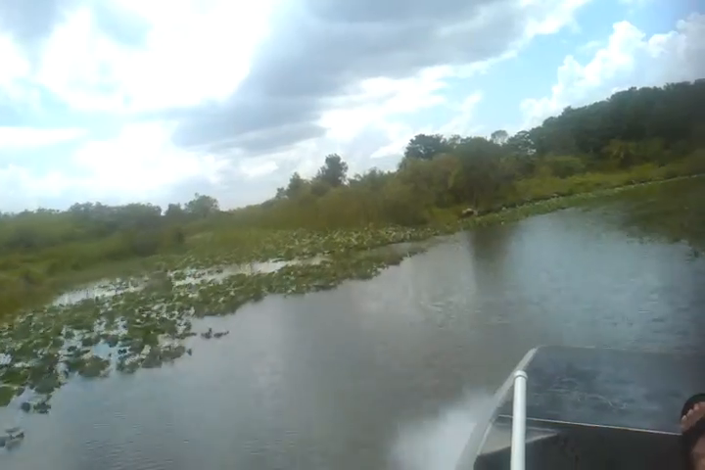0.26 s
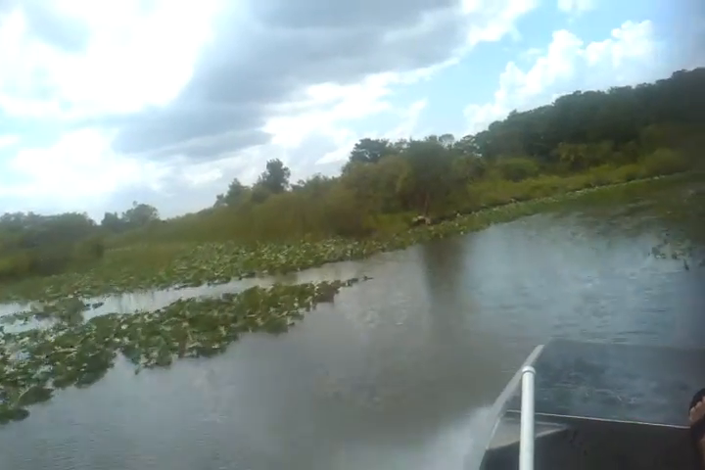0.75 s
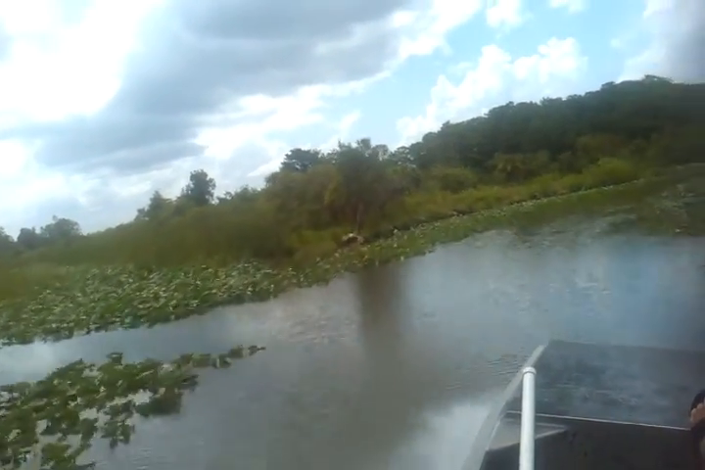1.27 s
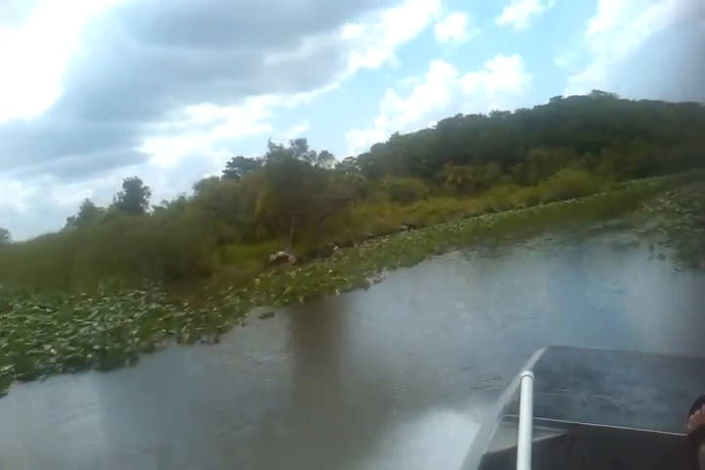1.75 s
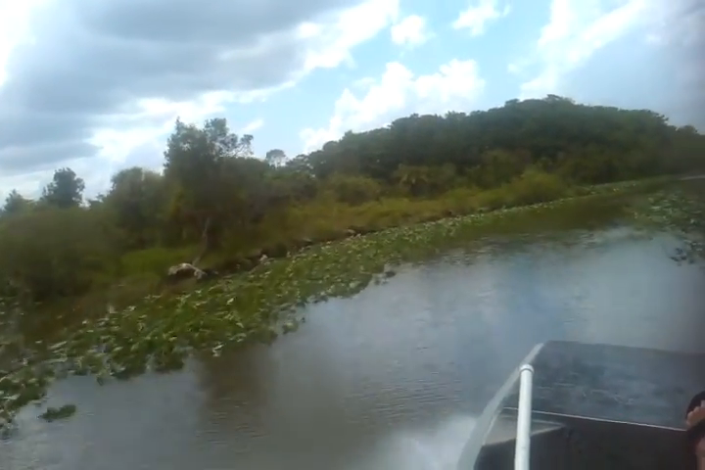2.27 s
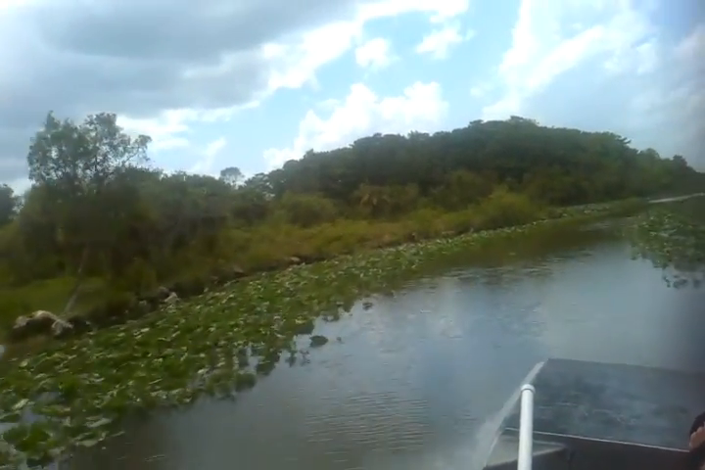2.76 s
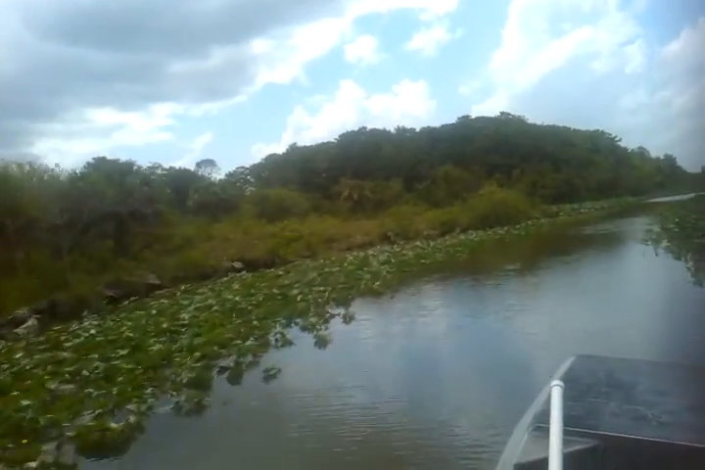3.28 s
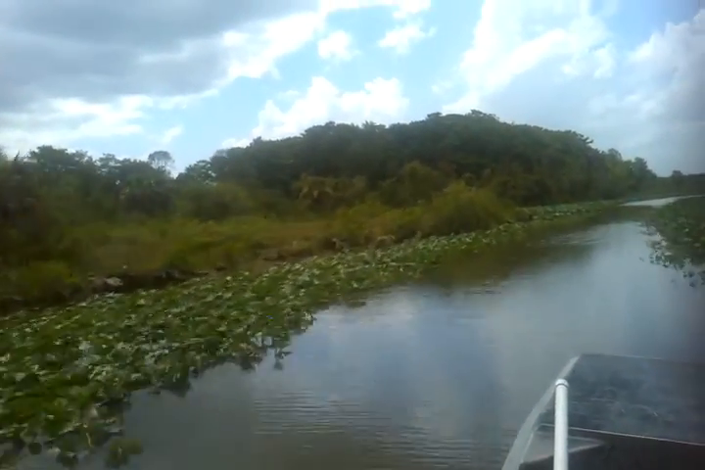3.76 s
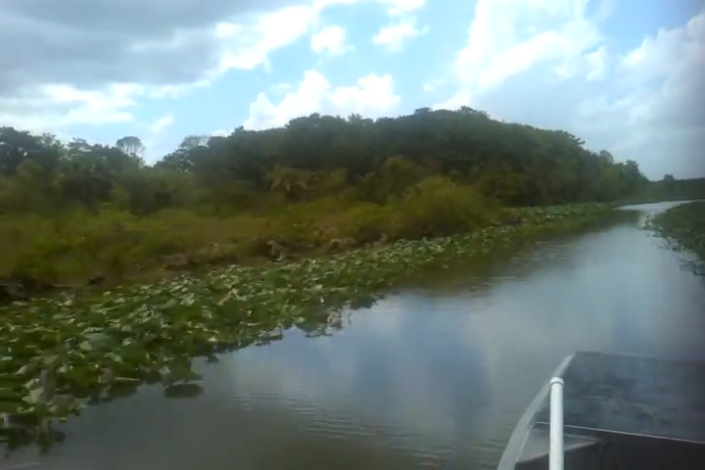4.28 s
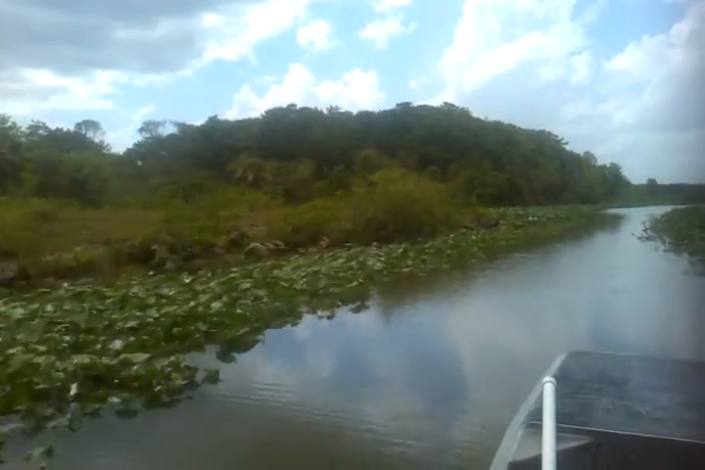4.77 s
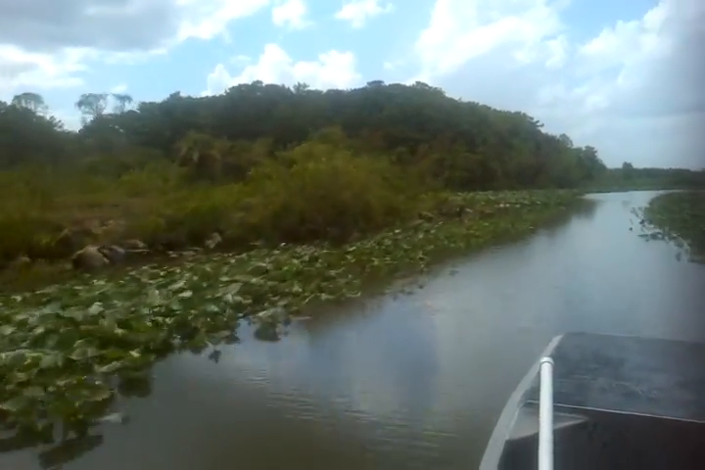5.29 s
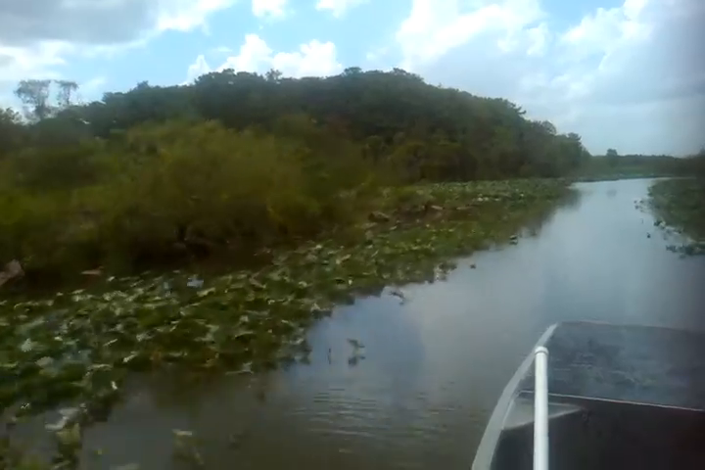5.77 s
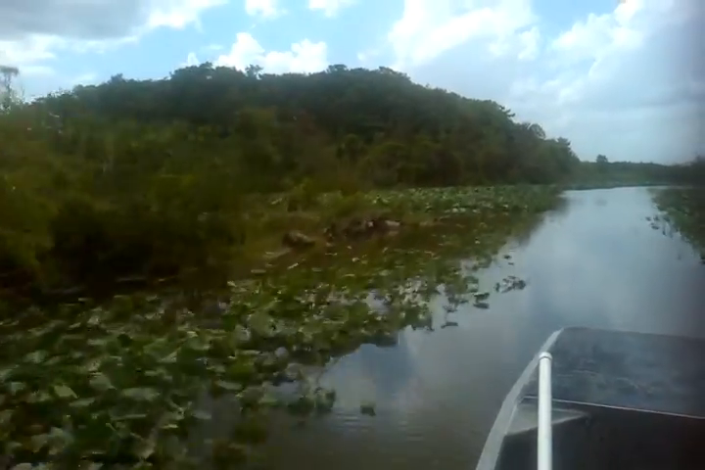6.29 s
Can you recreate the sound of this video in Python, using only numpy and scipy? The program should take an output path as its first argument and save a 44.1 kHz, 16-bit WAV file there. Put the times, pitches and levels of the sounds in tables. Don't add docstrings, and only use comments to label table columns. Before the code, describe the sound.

A continuous, dense airboat roar fills everything, captured close by a small stereo microphone ahead of the propeller cage. It begins at a moderate cruise, a buzzing, throbbing low drone with windy roar and fine hiss on top. After about two seconds the engine pulls harder, rising a few semitones and growing fuller, then holds nearly level to the end. The sound is outdoors, dry, with no echo, and lightly compressed.

```python
import sys
import numpy as np
from scipy import signal
from scipy.fft import rfft, irfft, next_fast_len
from scipy.io import wavfile
from scipy.ndimage import uniform_filter1d

SR = 44100
rng = np.random.default_rng(int(sys.argv[2]) if len(sys.argv) > 2 else 0)


def rack_gain(trim_db):
    fader = np.asarray(trim_db, float)
    return 10 ** (fader / 20)


def store_pcm(level_fs):
    pcm = np.round(np.clip(level_fs, -1, 1) * 32767).astype(np.int16)
    wavfile.write(sys.argv[1], SR, np.atleast_2d(pcm).T)


N = 288414
WIDE = next_fast_len(N)
STEP = 64
COARSE = N // STEP + 1
SLOW_HZ, FAST_HZ = 27.8, 32.8
GEAR = 2.61887


def fine(coarse):
    return np.interp(np.arange(N) / STEP, np.arange(len(coarse)), coarse)


def walk(rate_hz):
    hold = int(SR / STEP / rate_hz)
    held = np.repeat(rng.standard_normal(COARSE // hold + 1), hold)
    return 1.25 * uniform_filter1d(uniform_filter1d(held, hold), hold)[:COARSE]


def colour(table, hz):
    table_hz, value = np.transpose(table)
    return np.interp(np.log(hz + 1), np.log(table_hz), value)


# time_s, firing_cycle_hz
ENGINE_SPEED = [(0, 27.75), (.45, 27.85), (.85, 27.81), (1.1, 27.68), (1.4, 28.13), (1.7, 28.3),
                (1.95, 28.71), (2.3, 29.18), (2.45, 29.64), (2.8, 31.19), (3, 31.72), (3.3, 32.18),
                (3.75, 32.49), (4.5, 32.76), (4.85, 32.75), (5.5, 32.98), (5.9, 33.02), (6.54, 32.9)]


def engine_speed():
    time_s, firing_hz = np.transpose(ENGINE_SPEED)
    hz = np.interp(np.arange(COARSE) * STEP / SR, time_s, firing_hz)
    linger = int(.6 * SR / STEP)
    full_pull_hz_per_s = 4
    pull = uniform_filter1d(np.gradient(hz, STEP / SR), linger) / full_pull_hz_per_s
    return hz, pull


# pitch_hz, level_db (per Hz)
SHARED_NOISE = [(30, -58), (60, -58), (100, -56.5), (140, -53), (220, -48.5), (400, -49.5), (700, -55.5),
                (1200, -58.5), (2000, -65), (3800, -74), (5000, -76.5), (7300, -65.5), (10500, -74.5),
                (13500, -74)]
# pitch_hz, level_db (per Hz)
PORT_DIFFERENCE = [(30, -71.5), (60, -73), (100, -66), (160, -61), (250, -54.5), (400, -61.5), (700, -61),
                   (1000, -63), (2200, -66.5), (3200, -72.5), (5200, -76.5), (7500, -65), (10500, -74.5),
                   (13500, -73.5)]
# pitch_hz, share (-1 to 1)
LATE_SHARE = [(100, .3), (400, 0.36), (900, .01), (2200, 0.35), (4000, 0.089), (10000, .1)]


def slipstream_and_spray(cycle, blade, hz, pull):
    roar_db = .56 * hz + .54 * pull
    spray_db = .19 * hz + .6 * pull
    pitch = np.fft.rfftfreq(WIDE, 1 / SR)
    shared, other = rfft(rng.standard_normal((2, WIDE)))
    late = np.clip(colour(LATE_SHARE, pitch), -.95, .95)
    differ = 1j * late * shared + np.sqrt(1 - late ** 2) * other
    shared = shared * rack_gain(colour(SHARED_NOISE, pitch))
    differ = differ * rack_gain(colour(PORT_DIFFERENCE, pitch))
    pair = np.array([shared, differ]) * np.sqrt(SR / 2)

    roar, spray = np.zeros((2, N)), np.zeros((2, N))
    for octave in np.arange(4.5, 14.5, .75):
        window = np.clip(1 - np.abs(np.log2(pitch + 1) - octave) / .75, 0, 1)
        band = irfft(pair * window, WIDE)[:, :N]
        if 2 ** octave < 5000:
            swell_db = roar_db - roar_db.mean() + .18 * walk(5) + .52 * walk(20)
            roar += band * fine(rack_gain(swell_db))
        else:
            swell_db = spray_db - spray_db.mean() + .15 * walk(5.4) + .73 * walk(22)
            spray += band * fine(rack_gain(swell_db))
    throb = .14 * np.cos(blade - 2.3)
    throb += .2 * np.cos(3 * cycle - 1.3) + .08 * np.cos(2 * cycle + .3)
    return rack_gain(1.5) * roar * (1 + throb) + rack_gain(2.05) * spray * (1 + .22 * throb)


# pitch_hz, share (0 to 1)
OPPOSITE_PORT = [(3500, 0.98), (4400, 0.38), (5500, 0.27), (9000, 0), (14000, 0.27)]


def ports(pair):
    lag_samples, split_hz = 15, 7500
    pitch = np.fft.rfftfreq(WIDE, 1 / SR)
    share = np.clip(colour(OPPOSITE_PORT, pitch), 0, 1)
    pair = rfft(pair, WIDE)
    late = pair * np.exp(-2j * np.pi * pitch * lag_samples / SR) * np.array([[-1], [1]])
    windy = pair + share * late
    calm = (pair + late) * np.sqrt((1 + share ** 2) / 2)
    heard = irfft(windy, WIDE)[:, :N]
    for band, depth in ((pitch < split_hz, .62), (pitch >= split_hz, .72)):
        lull = np.array([fine(np.clip(depth * walk(45) - .05, 0, 1)) for _ in pair])
        heard = heard + lull * irfft((calm - windy) * band, WIDE)[:, :N]
    mid, side = heard
    return np.array([mid + side, mid - side])


def gear_whine(cycle, hz):
    teeth = 96
    dead_hz, dead_width_hz = 2860, 95
    dead_db = -14 * np.exp(-.5 * ((teeth * hz - dead_hz) / dead_width_hz) ** 2)
    level = fine(rack_gain(-44 + dead_db + 1.6 * walk(3.5)))
    note = level * np.cos(teeth * cycle + fine(.3 * walk(9)))
    return np.sqrt(2) * note * np.array([[1], [-1]])


# pitch_hz, left_leads_rad
LEFT_LEAD = [(110, 2.7), (170, 1.9), (240, .4), (330, .3), (500, .01)]


def turning_tones(levels, first, base_hz, turn, hz, shape, gain_db, pipe_db, wander_db, flutter_db, slip):
    pipe_hz, pipe_width_hz = 310.5, 11.8
    out = np.zeros((2, N))
    fast = np.interp(hz, [SLOW_HZ + 1, FAST_HZ - 1], [0, 1])
    for multiple, row in enumerate(levels, first):
        drift_db = gain_db[multiple - first] + wander_db * walk(3.03) + flutter_db * walk(14)
        off_pipe = (multiple * base_hz - pipe_hz) / pipe_width_hz
        drift_db += pipe_db * np.exp(-.5 * off_pipe ** 2)
        slow_phase, fast_phase = (np.polyval(terms, multiple) for terms in shape)
        swing = np.angle(np.exp(1j * (fast_phase - slow_phase)))
        waver = slip * np.sqrt(multiple) * walk(5)
        angle = multiple * turn + fine(slow_phase + swing * fast + waver)
        right_lag = colour(LEFT_LEAD, multiple * base_hz[0] / hz[0] * FAST_HZ)
        for port, lag, slow_fast_db in zip(out, (0, right_lag), (row[:2], row[2:])):
            db = np.interp(hz, [SLOW_HZ, FAST_HZ], slow_fast_db) + drift_db
            port += np.sqrt(2) * fine(rack_gain(db)) * np.cos(angle - lag)
    return out


# left_slow_db, left_fast_db, right_slow_db, right_fast_db
BLADE_TONES = [(-43.5, -31, -47, -35.5), (-22, -22.5, -44, -45), (-40, -36, -35, -31.5),
               (-33.5, -28, -40, -35), (-32, -22.5, -32, -30), (-30.5, -31.5, -31.5, -33),
               (-32, -30, -33, -35.5), (-33, -34.5, -32, -29), (-45, -32.5, -40, -26),
               (-39.5, -30, -34.5, -28), (-33.5, -35, -34.5, -32.5), (-37, -38, -39, -36),
               (-41, -37, -40, -36), (-39, -41, -36.5, -39.5), (-46, -36, -43, -35), (-49, -36, -43, -37.5),
               (-52, -38, -51, -37), (-45, -41, -46, -39)]
BLADE_PULSE = [
    (.37, 4.5, 1.7),
    (1.18, 4.86, -2.16),
]
BLADE_PULL = np.array([0, 1, 2, 4, 1.5, 4, 4, -3, 4.5, -3, 2.5, 1, 3, -1, -2, -2, 0, -2])


def propeller(blade, hz, pull):
    return turning_tones(BLADE_TONES, 1, GEAR * hz, blade, hz, BLADE_PULSE,
                         gain_db=.7 + np.outer(BLADE_PULL, pull), pipe_db=0,
                         wander_db=.7, flutter_db=1.8, slip=.07)


# left_slow_db, left_fast_db, right_slow_db, right_fast_db
EXHAUST_TONES = [(-60, -48, -62, -48), (-38, -31, -42, -39.5), (-50, -43, -51, -45), (-24, -16, -48, -50),
                 (-30, -35, -43, -40), (-23.5, -27, -47, -36.5), (-39, -19.5, -28.5, -25.5),
                 (-22.5, -37.5, -35, -45), (-27, -26.5, -41, -39), (-31.5, -37, -33.5, -44),
                 (-42, -42, -41, -39), (-32.5, -36.5, -37, -42), (-39, -46, -35, -47),
                 (-34, -36.5, -43, -35.5), (-39, -29, -42, -38), (-49, -43, -45, -40), (-47, -45, -47, -52),
                 (-44, -38, -40, -41), (-50, -49, -47, -51), (-41, -35, -39, -33)]
EXHAUST_PULSE = [
    (3.1, 2.43, -1.2),
    (1.99, 6.0, 2.41),
]
EXHAUST_PULL = np.array([2, 1, -2, 1, -2, 1, -.5, 0, 1.5, 5, 0, -6, 3, -4, 4, 0, 4, 2, 0, 0])


def exhaust(cycle, hz, pull):
    return turning_tones(EXHAUST_TONES, 2, hz, cycle, hz, EXHAUST_PULSE,
                         gain_db=.04 + np.outer(EXHAUST_PULL, pull), pipe_db=8.5,
                         wander_db=.45, flutter_db=.7, slip=.03)


def scene():
    hz, pull = engine_speed()
    cycle = 2 * np.pi * np.cumsum(fine(hz)) / SR
    blade = GEAR * cycle
    air = ports(slipstream_and_spray(cycle, blade, hz, pull))
    return air + gear_whine(cycle, hz) + propeller(blade, hz, pull) + exhaust(cycle, hz, pull)


def band_limit(x):
    return signal.sosfilt(signal.butter(12, 15240, fs=SR, output="sos"), x)


def record(dry):
    bass = signal.sosfilt(signal.butter(4, 200, fs=SR, output="sos"), dry[0])
    power = bass ** 2 + .12 * dry[0] ** 2 + 1e-9
    quick = uniform_filter1d(uniform_filter1d(power, int(.02 * SR)), int(.018 * SR))
    slow = uniform_filter1d(power, SR // 2)
    grip = .155 * np.minimum(slow / np.median(slow), 1) ** 2
    held = dry * (slow / quick) ** grip
    rounded = np.tanh(.8 * held) / .8
    top_cut = signal.ellip(14, .2, 70, 13950, fs=SR, output="sos")
    return band_limit(signal.sosfilt(top_cut, rounded))


dry = scene()
out = record(dry)
store_pcm(out)
```